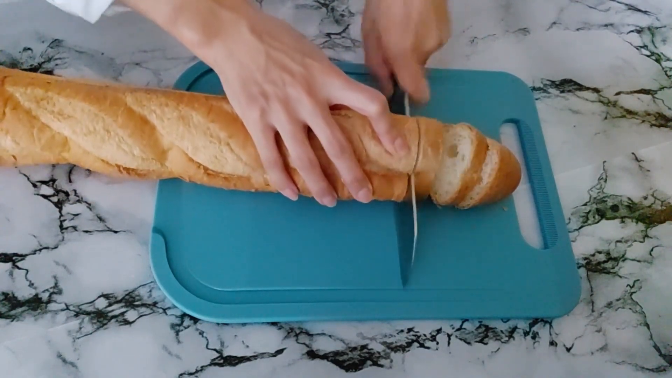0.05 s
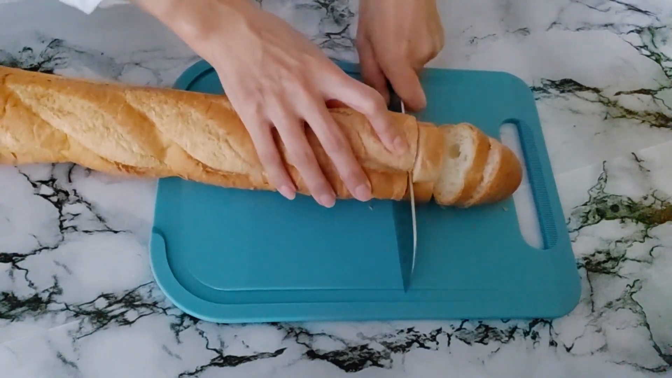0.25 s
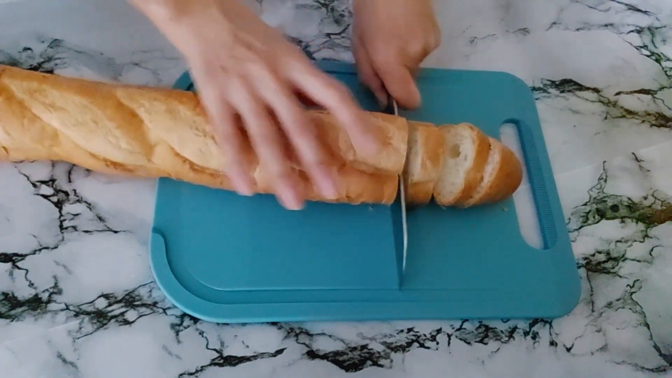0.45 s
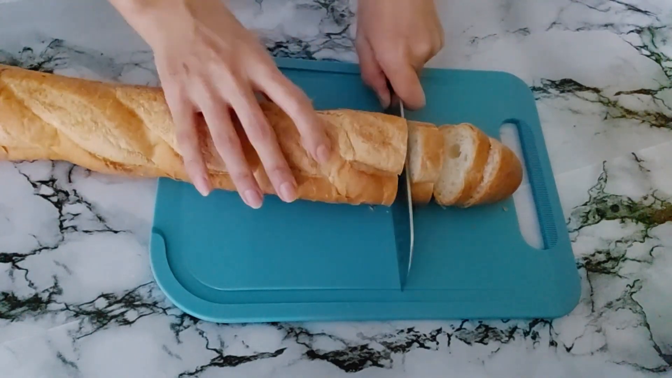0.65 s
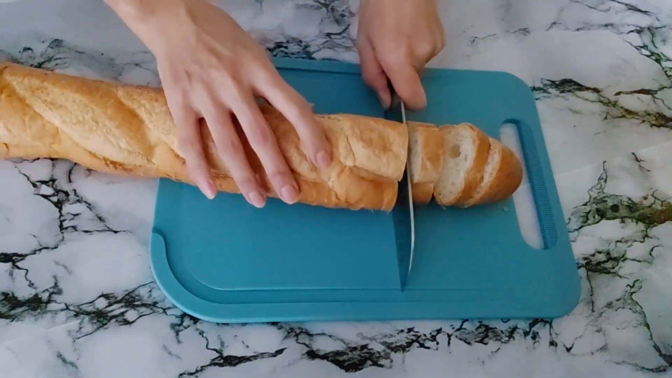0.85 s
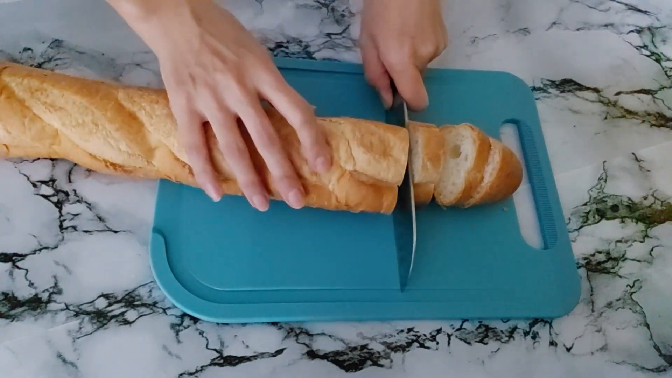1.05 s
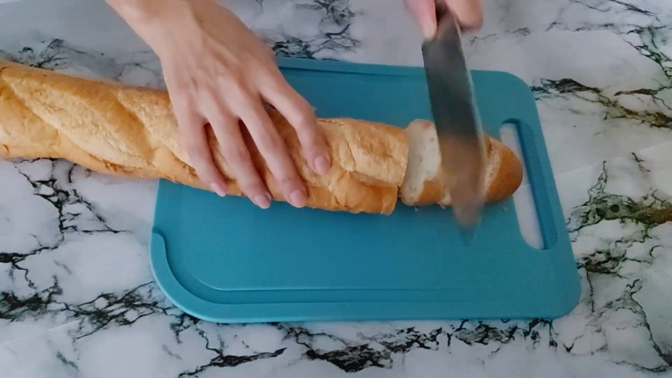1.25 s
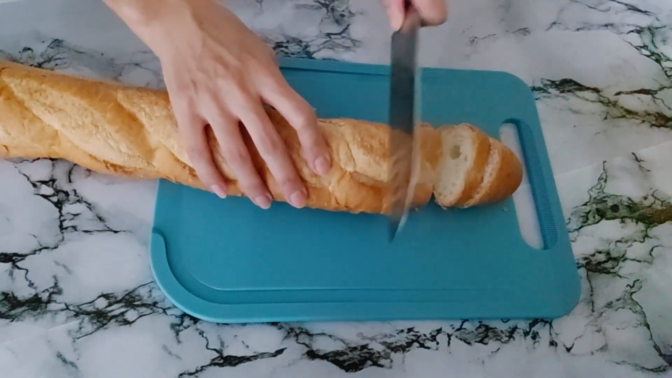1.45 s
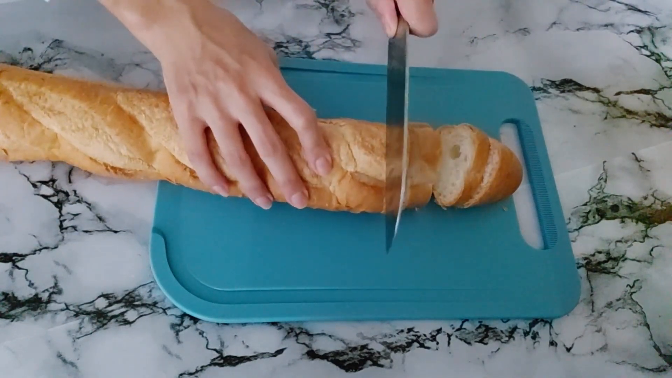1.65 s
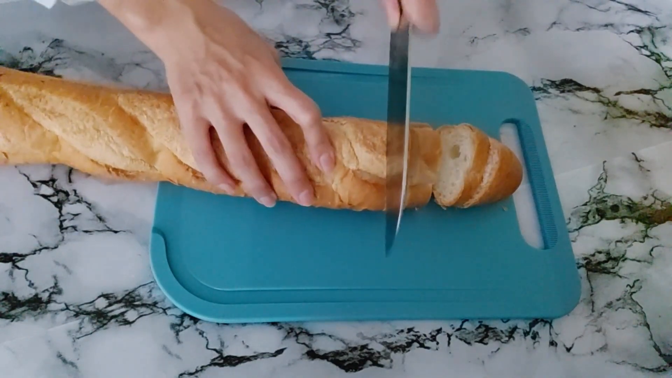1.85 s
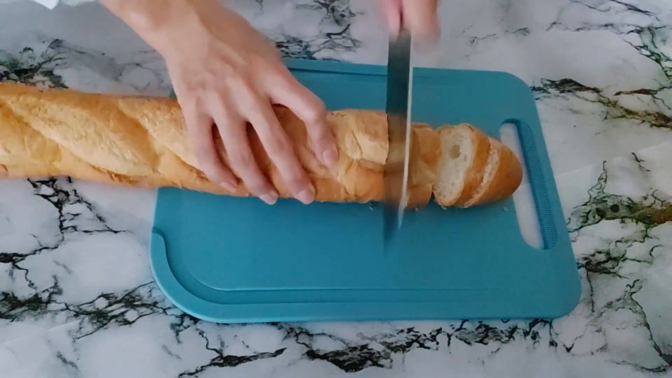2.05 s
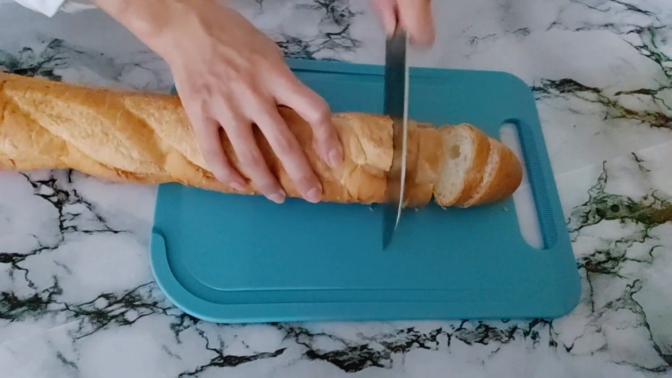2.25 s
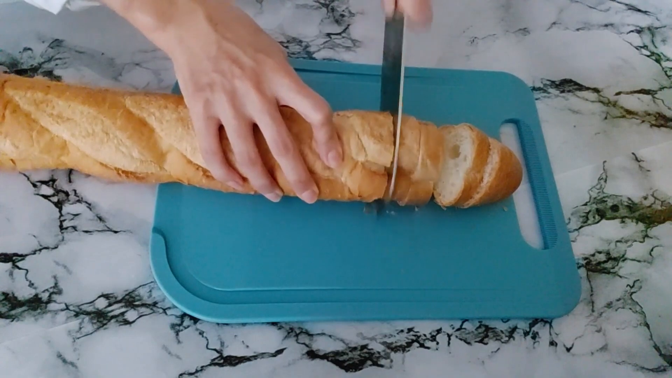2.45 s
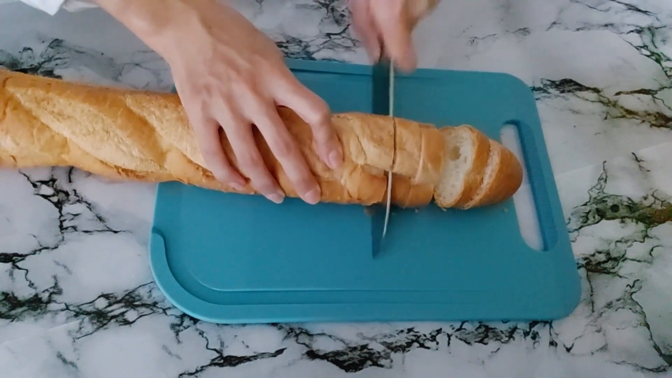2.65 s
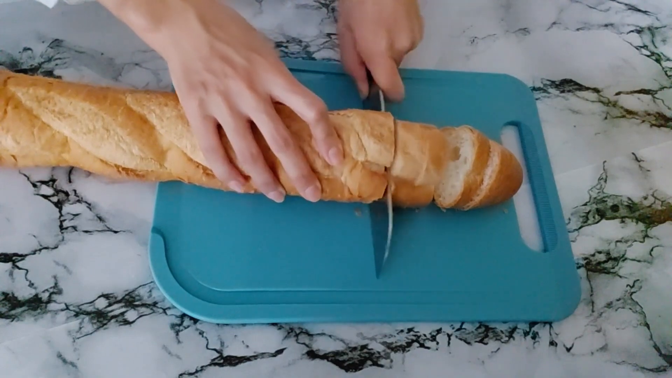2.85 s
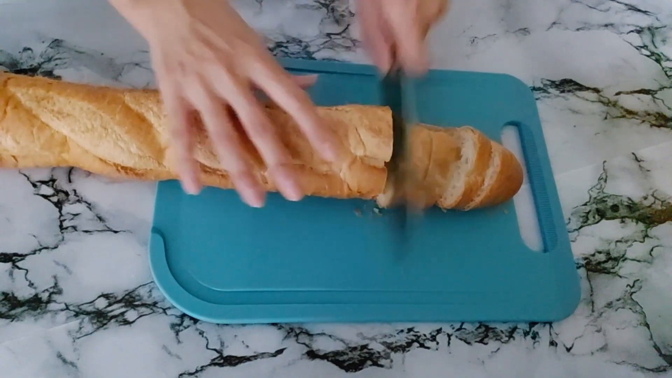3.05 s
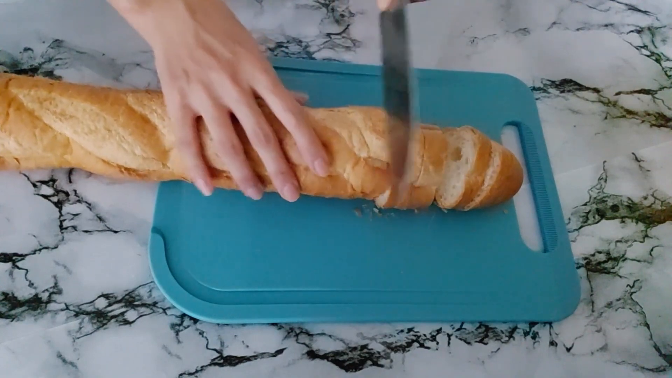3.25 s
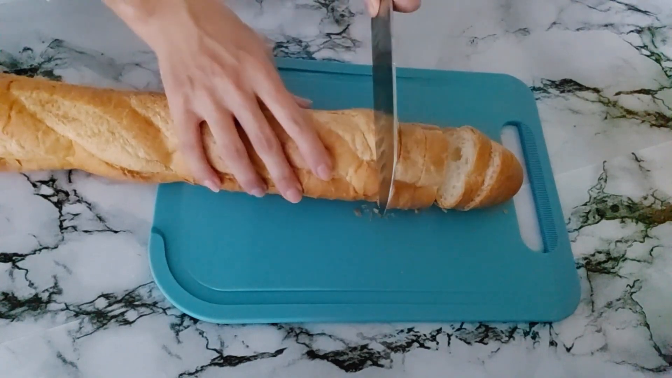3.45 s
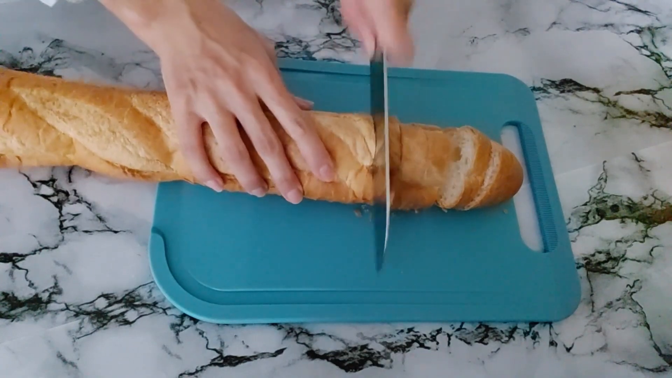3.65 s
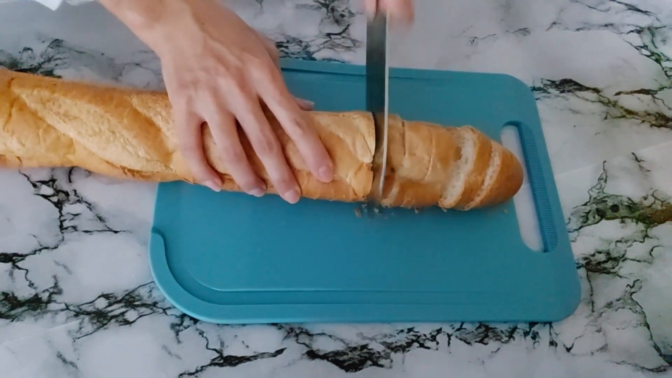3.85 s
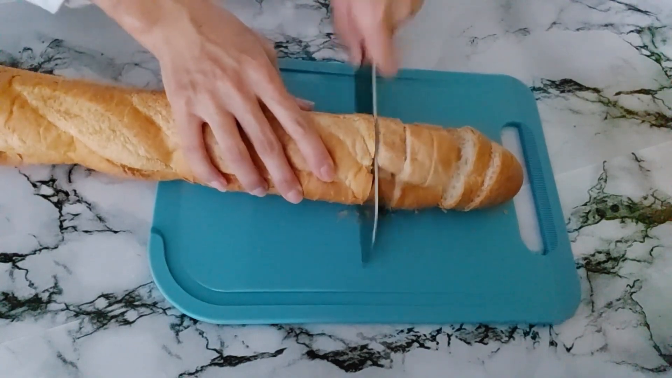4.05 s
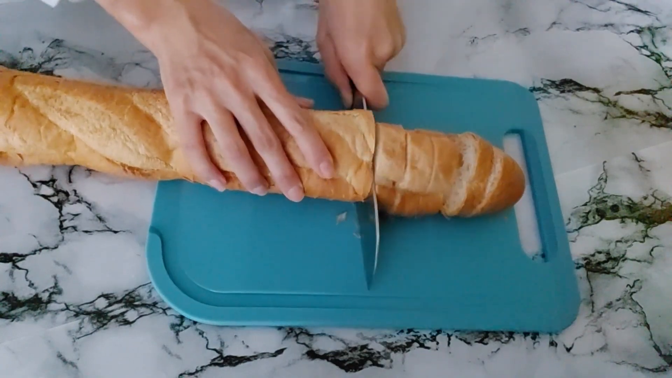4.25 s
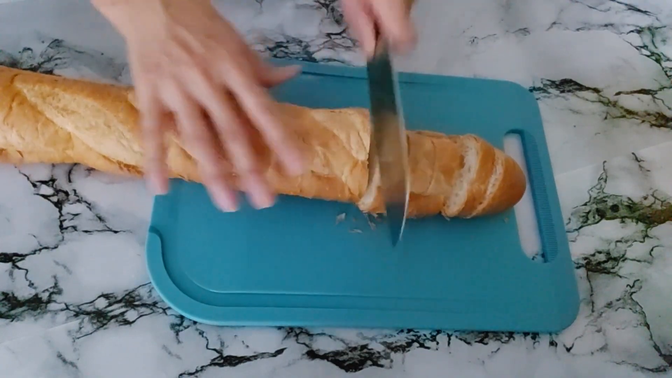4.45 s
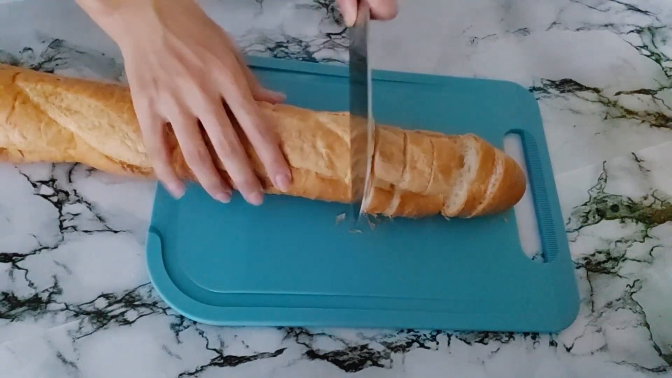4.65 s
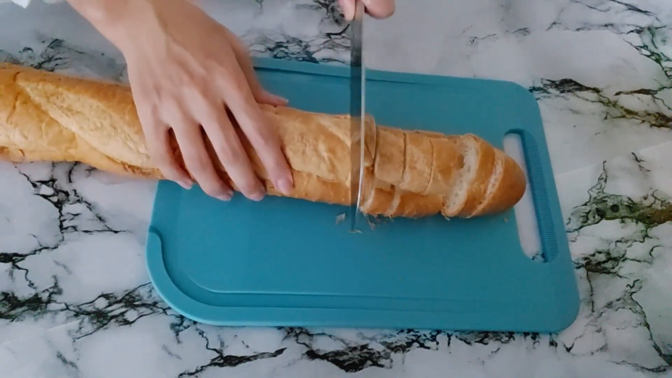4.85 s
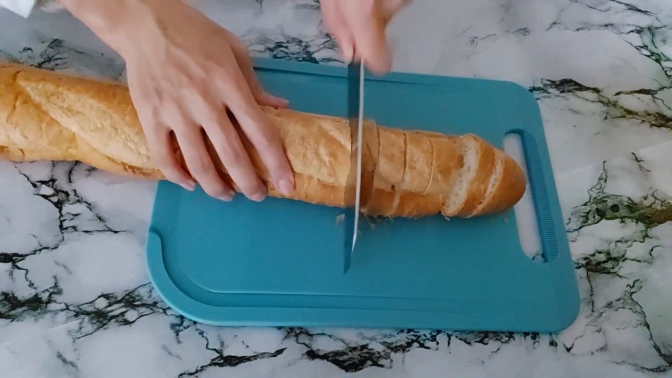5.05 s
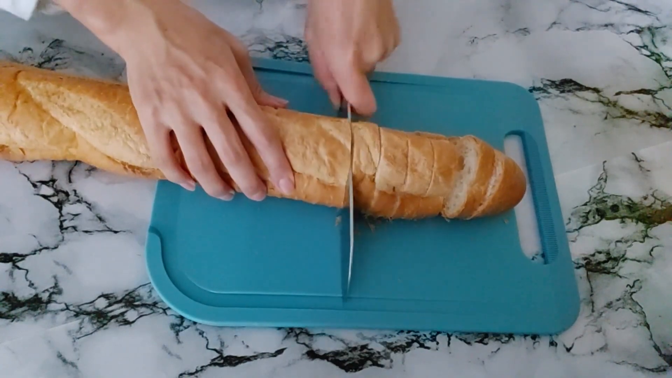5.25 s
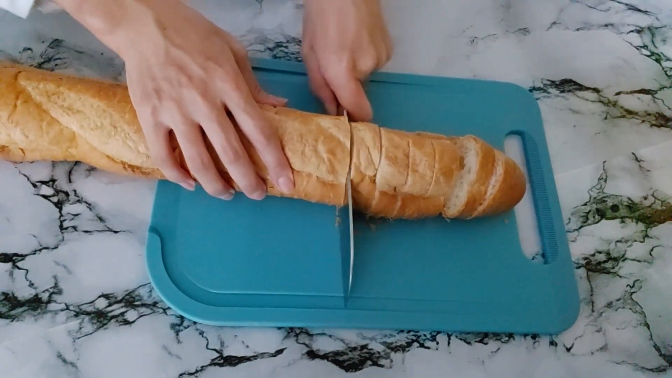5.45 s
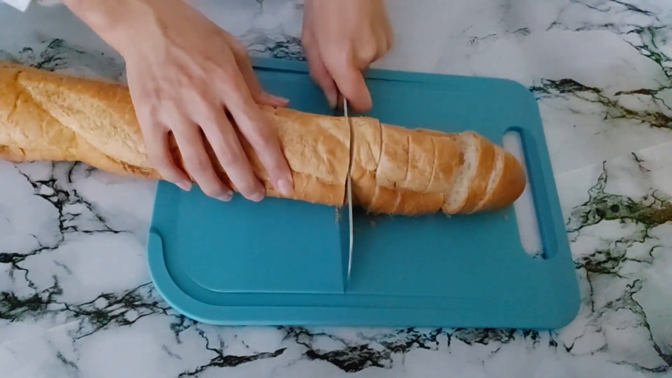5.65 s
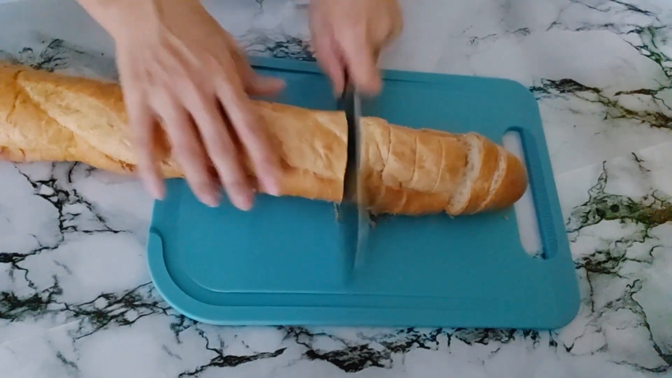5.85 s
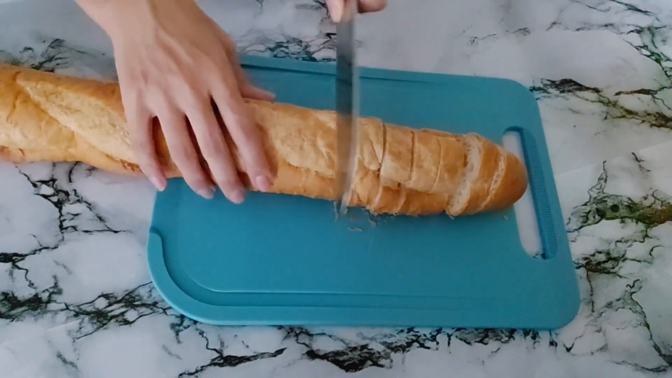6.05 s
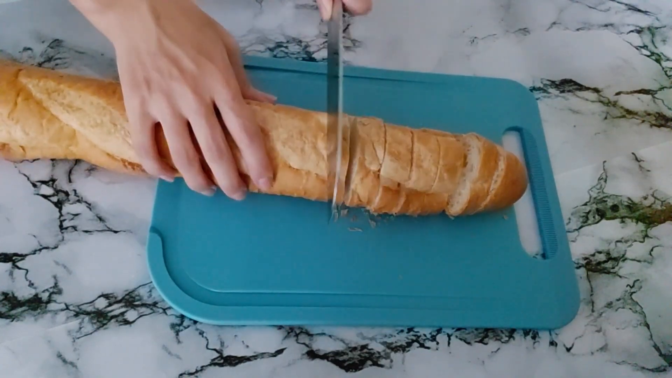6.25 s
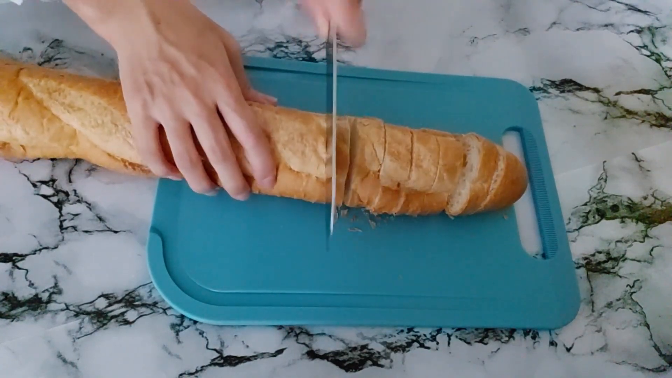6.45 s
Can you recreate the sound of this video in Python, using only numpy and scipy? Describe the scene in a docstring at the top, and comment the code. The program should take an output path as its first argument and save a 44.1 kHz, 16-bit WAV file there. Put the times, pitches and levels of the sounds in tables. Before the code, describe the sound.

A bread knife saws a stale baguette on a plastic board, close to stereo microphones in a quiet kitchen. A dry crunch and a knock come first, then a pause. Three more bouts of crackling strokes follow, each with sharp clacks on the board and dull thuds from the counter. Between cuts the blade scrapes faintly and a few crumbs tick down.

```python
"""A dry crunch and a knock come first: a bread knife sawing a stale baguette on a plastic board,
close to a stereo pair of microphones in a quiet kitchen. Each stroke crunches and fizzes as the teeth
break the crust; the blade comes through and knocks on the board, and the counter thuds under it.
Between cuts the edge scrapes, the steel sings faintly and crumbs tick down. Behind it all sit
the short reflections of the room, a low murmur and a thin whine."""
import sys
import numpy as np
from scipy import signal
from scipy.fft import rfft, irfft
from scipy.io import wavfile

SR = 44100
rng = np.random.default_rng(int(sys.argv[2]) if len(sys.argv) > 2 else 0)


def log_audio(samples):
    """Write samples as a 16-bit WAV file to the path given in sys.argv[1]."""
    # one column per channel
    frames = np.atleast_2d(samples).T
    # limit to full scale, then quantise
    limited = np.clip(frames, -1, 1)
    pcm = np.round(limited * 32767).astype(np.int16)
    wavfile.write(sys.argv[1], SR, pcm)


N = 287091
TIME = np.arange(N) / SR

# Spectra of the room tone, a crumb's tick, a knock's clack, the crust's crunch and its fizz.
# Each row: frequency in Hz, relative level in dB.
ROOM_TONE_SPECTRUM = [(20, -21), (45, -2), (62, -9.5), (100, 6), (180, -4.5), (245, 7.5), (380, -11.5),
                      (560, -9), (900, -25.5), (2000, -26.5), (4300, -37), (6500, -26), (16000, -35.5)]
CRUMB_SPECTRUM = [(100, -31), (1000, -20.5), (3000, 0.5), (5500, 3), (9000, -5.5), (16000, -9)]
KNOCK_SPECTRUM = [(30, -35), (150, -24.5), (350, -9), (600, 0), (950, -0.5), (1300, -7.5), (1800, -1),
                  (3000, -5.5), (6000, -0.5), (16000, 3)]
CRUNCH_SPECTRUM = [(25, -36), (60, -3), (150, -9), (250, 3), (340, -3.5), (520, 3.5), (900, 0), (1300, 1),
                   (1900, -3), (2900, -7), (4000, -17), (6000, -22), (9000, -38), (16000, -40.5)]
FIZZ_SPECTRUM = [(100, -10.5), (800, 0.5), (2000, -9), (4000, 1.5), (5500, 2), (8000, -0.5), (10000, -0.5),
                 (12500, 0.5), (16000, -3.5)]
# The kitchen's reverberation. Each row: frequency in Hz, seconds to fall 60 dB.
KITCHEN_DECAY = [(60, 0.36), (250, 0.21), (1000, 0.2), (3000, 0.2), (8000, 0.19), (16000, 0.31)]
# Crumbs and flakes of crust ticking down. Each row: start in seconds, peak level in dB.
CRUMB_TICKS = [(0.092, -31), (0.134, -33), (0.376, -64), (1.178, -58.5), (3.439, -61), (4.383, -55),
               (4.482, -39), (4.486, -45.5), (4.755, -60), (5.824, -49), (6.087, -56.5)]
# Edge and loaf scraping over the board, and the steel singing as it slides free or finds the crust.
# Each row: middle in seconds, length in seconds, level in dB, pitch in Hz, bandwidth in Hz.
BOARD_SCRAPES = [(0.455, 0.15, -72, 1050, 800), (1.178, 0.035, -57, 790, 170),
                 (2.03, 0.051, -49.5, 1200, 603), (2.265, 0.1, -49.5, 1110, 450),
                 (2.845, 0.034, -42, 725, 222), (3.08, 0.13, -69.5, 682, 300), (3.67, 0.1, -67, 980, 500),
                 (4.208, 0.066, -37, 937, 300), (4.412, 0.022, -52.5, 760, 220),
                 (4.445, 0.028, -55, 795, 160), (5.47, 0.029, -37.5, 900, 500), (5.61, 0.13, -63, 850, 300),
                 (5.893, 0.025, -61, 800, 220), (6.37, 0.11, -69.5, 420, 200)]
STEEL_SINGING = [(3.03, 0.24, -73.5, 2790, 459), (4.53, 0.13, -78, 4760, 200),
                 (5.87, 0.18, -76.5, 3320, 450), (5.995, 0.11, -72.5, 3640, 700),
                 (5.96, 0.06, -73, 6900, 90), (5.97, .1, -73, 10250, 70), (6.44, 0.22, -75.5, 3500, 400)]
# The counter thudding under hand and knife. Each row: start in seconds, level in dB, pitch in Hz.
COUNTER_THUDS = [(0.0, -34, 225), (0.183, -36.5, 109), (0.189, -40.5, 64.5), (1.644, -51, 64),
                 (2.669, -45, 97), (2.799, -45, 115.3), (2.855, -38.5, 60.7), (3.445, -50.5, 68.5),
                 (3.721, -42, 74.6), (4.098, -36, 110), (4.24, -25.5, 58.3), (4.519, -45, 157.5),
                 (4.767, -46, 76.7), (5.159, -38.5, 103), (5.475, -30.5, 68.3), (5.479, -38, 140),
                 (5.972, -38.5, 154), (5.983, -44, 88.6), (6.257, -50, 59.1)]
# The plastic board's modes. Each row: frequency in Hz, relative level in dB, seconds to fall 60 dB.
BOARD_MODES = [(246, -1, 0.1), (533, -5.5, .07), (760, -6.5, 0.041), (945, -7.5, 0.085), (1110, -9, 0.07),
               (1683, -7, 0.05), (1847, -10, 0.05), (2300, -13.5, 0.1)]
# Blade and loaf knocking on the board. Each row: start in seconds, clack level in dB,
# brightness as a cut-off in Hz, ring level in dB, left over right in dB.
BOARD_KNOCKS = [(0.1741, -18.5, 3980, -59, 1), (1.165, -48, 1250, -57, 4), (1.631, -43.5, 1570, -56, 3.5),
                (1.769, -52, 3800, -81, 16), (2.307, -28.5, 2500, -40, 7.5), (2.6674, -6.5, 3240, -21, 3.5),
                (3.105, -50, 2550, -68, 3.5), (3.437, -53, 1390, -66, 4), (3.714, -22, 2820, -36.5, 1.5),
                (4.041, -30, 2500, -61, 2), (4.092, -4.5, 3050, -18, 3.5), (4.2271, -7, 2400, -42, 2.5),
                (4.413, -44, 2420, -60, 13), (4.437, -40.5, 1693, -62, 6), (4.648, -46.5, 1100, -55, 1.5),
                (4.753, -42, 1535, -49, 2), (5.008, -55, 1500, -49, 6), (5.057, -28.5, 2200, -55, 6),
                (5.191, -18, 3650, -32, 10.5), (5.392, -17, 2360, -36.5, 3),
                (5.4693, -16, 1470, -35.5, 0.5), (5.571, -44, 1100, -60, -6), (5.966, -48, 900, -47.5, 6),
                (6.084, -45, 1110, -49, 2.5), (6.24, -61.5, 889, -62.5, -4)]
# Strokes of the blade. Each row: start, rise and hold in seconds, then in dB the crust's crunch,
# the teeth's fizz, growth over the hold, crust hardness as treble lift, board pressure as bass lift.
BLADE_STROKES = [(0.0, 0.0012, .012, -35.5, -46, -3, 5.5, -2),
                 (0.017, 0.027, .12, -37, -46, -0.5, 3.5, -0.5),
                 (0.36, 0.042, 0.083, -74, -78.5, -3.5, -20, 12.5),
                 (1.148, 0.022, 0.082, -78, -76.5, -5, -6, 13), (1.757, .018, .06, -58, -67.5, -3, -1, -1),
                 (1.87, .07, .095, -48, -57, 7, -16, 0), (2.073, .05, .08, -44, -49.5, 0.5, -3.5, -4),
                 (2.241, .055, .105, -34, -46.5, 2, -4.5, -3.5), (2.434, .05, .065, -43, -44, 0.5, 5, -6),
                 (2.61, .045, 0.18, -34, -43.5, -7.5, 5.5, -3),
                 (2.896, 0.064, .18, -68, -73, 0.5, 3.5, 12.5), (3.607, 0.05, .03, -64, -69, 5, -5, 6),
                 (3.701, .018, 0.034, -32.5, -46.5, -2, -10, 1), (3.756, .035, 0.02, -36, -49, 0, -3.5, 2),
                 (3.83, .045, .08, -41, -46.5, -1, -3.5, -7.5),
                 (4.023, 0.036, 0.07, -32.5, -40, 1.5, 3.5, -2), (4.127, .04, .065, -35, -43.5, 1.5, 1, -2),
                 (4.366, 0.038, .03, -61, -66.5, -6, 1, 15.5), (4.467, 0.016, .04, -63, -67, -8.5, 8.5, 3),
                 (5.002, .013, .03, -55.5, -63, 5, -14.5, 13), (5.029, .035, .07, -36, -51, 1.5, -13, 2),
                 (5.115, .04, .115, -34, -46, -2, -2, 1.5), (5.25, .04, .065, -40, -50, -7, -4, 2),
                 (5.366, 0.023, .02, -41.5, -45, -3.5, -2.5, 2.5),
                 (5.431, .03, .03, -50.5, -58, -3, 4.5, -1), (5.556, 0.043, .055, -60, -63.5, -3, 3.5, 7.5),
                 (5.822, .01, .09, -71, -75, -0.5, 2.5, 1.5), (5.921, .015, 0.071, -67, -67, -6.5, 7.5, -4),
                 (6.432, .06, .06, -51, -59.5, 4.5, -1.5, 2.5)]

BITE_DB, ARCH_DB = 18, 1.5  # a stroke's climb during its rise; its arch where the blade is fastest
CRUNCH_FADE_DB_PER_S, FIZZ_FADE_DB_PER_S = 399, 380  # as the blade slows to turn round
SETTLE_DB, SETTLE_DB_PER_S = -32.5, 85  # after a stroke the torn crust goes on crackling softly
REST_CRUNCH_DB, REST_FIZZ_DB = -85.5, -85  # the crust creaks faintly under the holding hand
THUD_T60_S = .23
BAND_LIMIT_HZ = 15780


def gain_of(db):
    """Decibels to amplitude."""
    return 10 ** (np.asarray(db) / 20)


def unit_rms(x):
    """Scales to an rms of one."""
    return x / np.sqrt(np.mean(x ** 2) + 1e-20)


def curve_at(points, hz):
    """Reads a curve on a log-frequency axis."""
    f, value = np.transpose(points)
    return np.interp(np.log(hz + 1), np.log(f + 1), value)


def add(mix, start_s, sound):
    """Mixes a sound in from the given moment."""
    part = mix[:, max(round(start_s * SR), 0):]
    size = min(part.shape[-1], sound.shape[-1])
    part[:, :size] += sound[..., :size]


def convolve(x, response):
    """Passes each channel through a response, keeping the length."""
    return signal.fftconvolve(np.atleast_2d(x), np.atleast_2d(response), axes=1)[:, :x.shape[-1]]


def colour(x, spectrum, size=4096):
    """Causal filter with the given spectrum: attacks stay sharp."""
    log_gain = np.log(gain_of(curve_at(spectrum, abs(np.fft.fftfreq(size, 1 / SR)))))
    minimum_phase = np.exp(np.conj(signal.hilbert(log_gain)))
    return convolve(x, np.fft.ifft(minimum_phase).real)


def lowpass(x, hz):
    """Gentle low-pass without delay."""
    return signal.sosfiltfilt(signal.butter(2, hz, fs=SR, output="sos"), x)


def narrow_noise(size, hz, width_hz):
    """Noise through one resonance, nearly alike at both microphones."""
    f = np.fft.rfftfreq(size, 1 / SR)
    noise = rng.standard_normal(size) + 0.25 * rng.standard_normal((2, size))
    return unit_rms(irfft(rfft(noise) / (1 + ((f - hz) / width_hz * 2) ** 2), size))


def room_tone():
    """The kitchen at rest: a low murmur, faint hiss and a thin steady whine."""
    hz = np.fft.rfftfreq(N, 1 / SR)
    noise = rfft(rng.standard_normal((2, N)))
    alike = 0.53 * np.exp(-hz / 1500)
    noise[1] = alike * noise[0] + np.sqrt(1 - alike ** 2) * noise[1]
    murmur = unit_rms(irfft(noise * gain_of(curve_at(ROOM_TONE_SPECTRUM, hz)), N))
    whine = narrow_noise(N, hz=5350, width_hz=110)
    return gain_of(-67) * murmur + gain_of(-97) * whine


def kitchen_reflections(x):
    """Dense reflections from hard surfaces, each band dying at its own speed."""
    hz, t, noise = signal.stft(rng.standard_normal((2, SR // 2)), SR, nperseg=256)
    alike = np.exp(-hz / 1200)[:, None]  # the microphones are close together: both get the same bass
    noise[1] = alike * noise[0] + np.sqrt(1 - alike ** 2) * noise[1]
    decay = gain_of(-60 * t / curve_at(KITCHEN_DECAY, hz)[:, None])
    tail = signal.istft(noise * decay, SR, nperseg=256)[1]
    tail *= 1 - np.exp(-(TIME[:tail.shape[1]] / 0.0015) ** 2)
    return convolve(x, tail / np.linalg.norm(tail[0]))


def crumbs():
    """Dry flakes snap off and skitter."""
    out, t = np.zeros((2, N)), TIME[:SR // 8]
    for start, db in CRUMB_TICKS:
        snap, skitter = gain_of(-60 * t / .016), gain_of(-9 - 60 * t / .11)
        tick = colour(rng.standard_normal((2, len(t))) * (snap + skitter), CRUMB_SPECTRUM)
        add(out, start, gain_of(db) * tick / abs(tick).max())
    return out


def steel_slides(rows):
    """Steel slides along board or crust: its random slips swell and fade in one resonance."""
    out = np.zeros((2, N))
    for middle, length, db, hz, width_hz in rows:
        size = max(int(length * SR), 64)
        swell = signal.windows.tukey(size, .7)
        add(out, middle - length / 2, gain_of(db) * narrow_noise(size, hz, width_hz) * swell)
    return out


def counter_thuds():
    """The counter gives under the push and swings a few times, with a dull rumble of what lies on it."""
    out, t = np.zeros((2, N)), TIME[:SR // 2]
    for start, db, hz in COUNTER_THUDS:
        swing = np.sin(2 * np.pi * hz * t) * gain_of(-60 * t / THUD_T60_S)
        rumble = narrow_noise(len(t), 1.7 * hz, 2.4 * hz) * gain_of(-10 - 60 * t / .22)
        add(out, start, gain_of(db) * (1 - np.exp(-t / 0.0028)) * (swing + rumble))
    return out * gain_of([[.7], [-.7]])  # a little left of centre


def board_ring(t):
    """The plastic board's answer to one blow: all modes start from rest."""
    return sum(gain_of(db - 60 * t / t60) * np.sin(2 * np.pi * hz * t) for hz, db, t60 in BOARD_MODES)


def board_knocks():
    """A short clack, a brief chatter of the board on the counter, then its modes swell and die."""
    out, t = np.zeros((2, N)), TIME[:SR // 3]
    for start, db, bright_hz, ring_db, pan_db in BOARD_KNOCKS:
        softness = signal.butter(4, bright_hz, fs=SR, output="sos")  # a soft blow wakes no high modes
        rattle = rng.standard_normal(len(t)) + 0.61 * rng.standard_normal((2, len(t)))
        chatter = rattle * gain_of(-28 - 60 * t / .055) * (1 - np.exp(-t / .001))
        push = np.array([t == 0, t == t[3]])  # the left microphone hears it first
        blow = signal.sosfilt(softness, colour(push + chatter, KNOCK_SPECTRUM))
        # bending waves are slower at low pitch, so all-passes spread the clack over a few swings
        blow = signal.sosfilt([[.8, -a, 1, 1, -a, .8] for a in (1.77, 1.73, 1.65)], blow)
        clack = gain_of(db - 1.5) * blow / abs(blow).max()
        ring = gain_of(ring_db) * signal.sosfilt(softness, board_ring(t)) * (1 - np.exp(-t / 0.0061))
        add(out, start, (clack + ring) * gain_of([[pan_db / 2], [-pan_db / 2]]))
    return out


def fractures(per_s, spread_db, max_spreads):
    """A train of tiny breaks in the crust: many small ones, a few large."""
    size = gain_of(spread_db * np.minimum(rng.exponential(1, N), max_spreads))
    return unit_rms(size * rng.choice([-1, 1], N) * (rng.random(N) < per_s / SR))


def stereo_fractures(per_s, spread_db, apart):
    """Breaks radiate unevenly: the share `apart` reaches one microphone, the rest both, left first."""
    shared, left, right = (fractures(per_s, spread_db, max_spreads=4.5) for _ in range(3))
    both = np.array([shared, np.roll(shared, 3)])
    return np.sqrt(1 - apart) * both + np.sqrt(apart) * np.array([left, right])


def flakes(low_hz, high_hz, ring_cycles, per_s, count=28):
    """Each loosened flake of crust crackles in spells at its own pitch, so the colour keeps shifting."""
    out, t = np.zeros((2, N)), TIME[:SR // 30]
    moments = np.arange(0, N / SR + .1, .04)
    for hz in np.geomspace(low_hz, high_hz, count):
        spells = gain_of(5 * np.interp(TIME, moments, rng.standard_normal(len(moments))))
        snaps = fractures(per_s, spread_db=3, max_spreads=3) * spells
        swing = np.sin(2 * np.pi * hz * t + rng.normal(0, 0.93, (2, 1))) * np.exp(-hz * t / ring_cycles)
        out += signal.oaconvolve(snaps[None], swing * np.sqrt(low_hz / hz), axes=1)[:, :N]
    return unit_rms(out)


def stroke_level(start, rise, hold, growth_db, fade_db_per_s):
    """One stroke in dB: the teeth bite, run through in an arch and slow down; the crust settles."""
    biting = np.maximum(1 - (TIME - start) / rise, 0)
    along = np.clip((TIME - start - rise) / hold, 0, 1) - .5
    after = np.maximum(TIME - start - rise - hold, 0)
    release = np.maximum(-fade_db_per_s * after, SETTLE_DB - SETTLE_DB_PER_S * after)
    return np.maximum(growth_db * along - ARCH_DB * (2 * along) ** 2 - BITE_DB * biting + release, -100)


def blade_levels():
    """All strokes in turn: crunch, fizz, hardness and pressure in dB; the loudest sets the colour."""
    crunch, fizz = np.full(N, gain_of(REST_CRUNCH_DB) ** 2), np.full(N, gain_of(REST_FIZZ_DB) ** 2)
    hardness, pressure = np.zeros(N), np.zeros(N)
    for start, rise, hold, crunch_db, fizz_db, growth_db, hard_db, press_db in BLADE_STROKES:
        power = gain_of(crunch_db + stroke_level(start, rise, hold, growth_db, CRUNCH_FADE_DB_PER_S)) ** 2
        crunch += power
        fizz += gain_of(fizz_db + stroke_level(start, rise, hold, growth_db, FIZZ_FADE_DB_PER_S)) ** 2
        hardness += hard_db * power
        pressure += press_db * power
    return 10 * np.log10(crunch), 10 * np.log10(fizz), hardness / crunch, pressure / crunch


def sawing():
    """Crust breaks under the teeth and sounds through loaf and board; finer splinters fizz above it."""
    crunch_db, fizz_db, hard_db, press_db = blade_levels()
    breaks = stereo_fractures(per_s=3500, spread_db=3.5, apart=.71) * gain_of(crunch_db)
    splinters = stereo_fractures(per_s=7000, spread_db=3.2, apart=.7) * gain_of(fizz_db)
    crunch = unit_rms(colour(breaks, CRUNCH_SPECTRUM)) * breaks.std()
    fizz = unit_rms(colour(splinters, FIZZ_SPECTRUM)) * splinters.std()
    bass, treble = lowpass(crunch, 450), crunch - lowpass(crunch, 2300)
    loaf = gain_of(-5.5) * (crunch - bass - treble) + gain_of(3.5 + hard_db) * treble
    loaf += gain_of(-8 + crunch_db) * flakes(low_hz=800, high_hz=3970, ring_cycles=4.5, per_s=40)
    # the board carries the long waves, which reach both microphones alike
    ring = unit_rms(convolve(breaks[0], board_ring(TIME[:SR // 4]))) * breaks.std()
    board = gain_of(1.5 + press_db) * bass[0] + gain_of(-12 + press_db / 2) * ring
    return (loaf + board) * gain_of([[.5], [-.5]]) + gain_of(1.5) * fizz * gain_of([[-.3], [.3]])


def scene():
    """Knife, loaf and board close up, the counter below and the kitchen behind."""
    saw = sawing() + steel_slides(BOARD_SCRAPES) + steel_slides(STEEL_SINGING)
    hits = board_knocks() + crumbs()
    reflections = kitchen_reflections(gain_of(-8.5) * saw + gain_of(-5.5) * hits)
    return gain_of(-1.25) * saw + hits + counter_thuds() + reflections + room_tone()


def record(dry):
    """The microphones shed the deepest bass, and the highest treble is cut off."""
    low_cut = signal.butter(3, 38, "high", fs=SR, output="sos")
    band_limit = signal.firwin(1023, BAND_LIMIT_HZ, window=("kaiser", 9), fs=SR)
    return signal.oaconvolve(signal.sosfilt(low_cut, dry), band_limit[None], "same")


dry = scene()
out = record(dry)
log_audio(out)
```